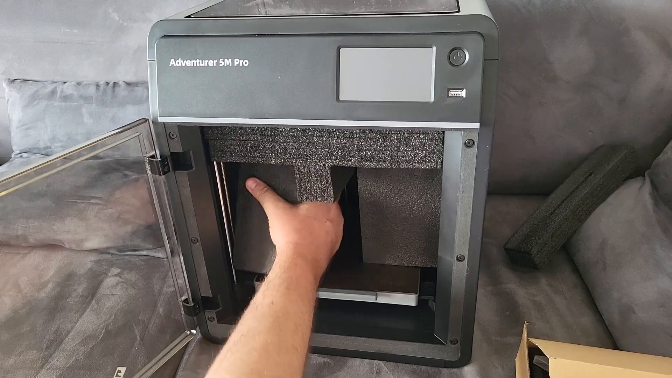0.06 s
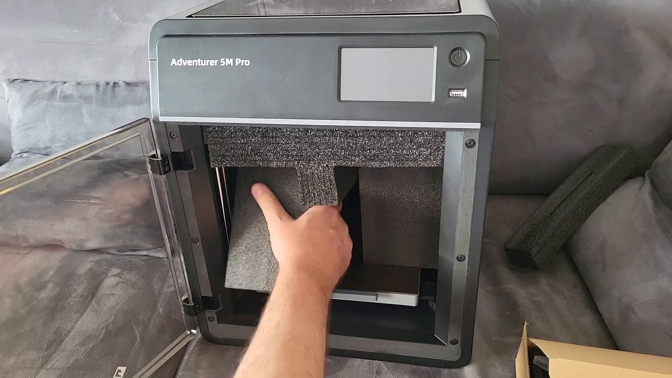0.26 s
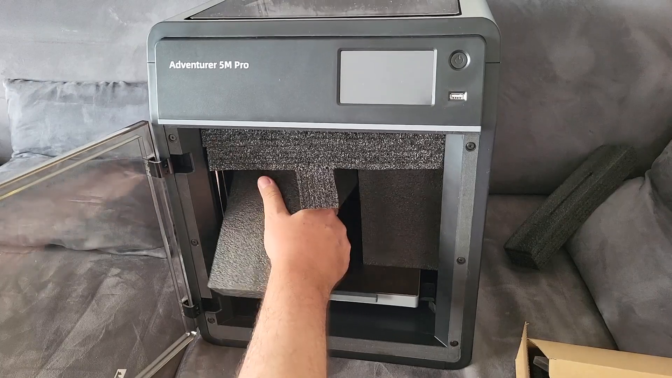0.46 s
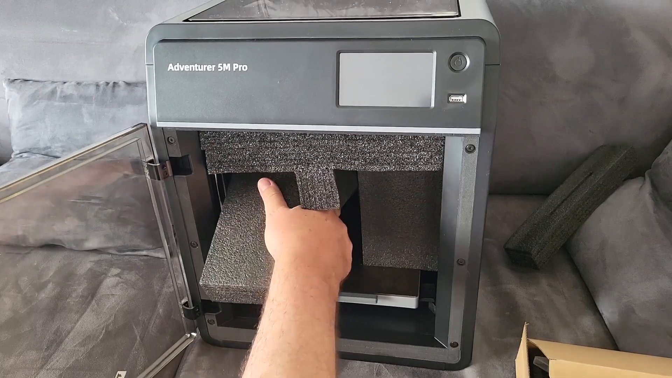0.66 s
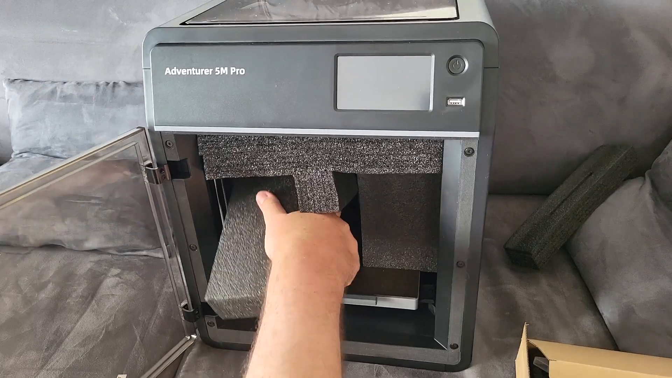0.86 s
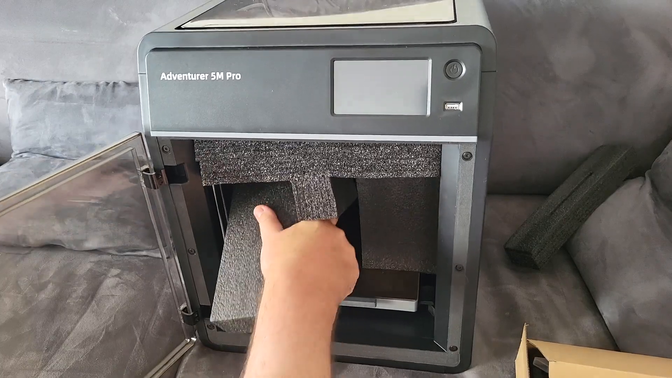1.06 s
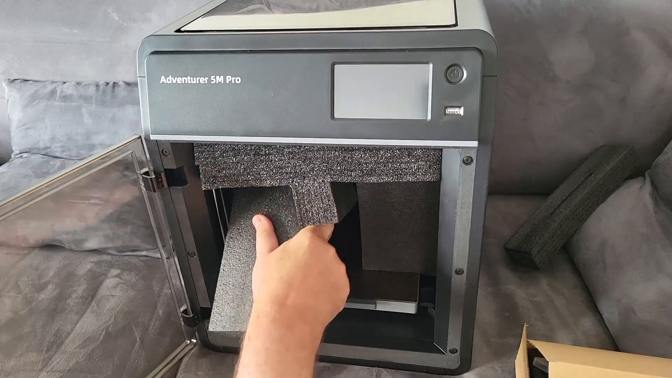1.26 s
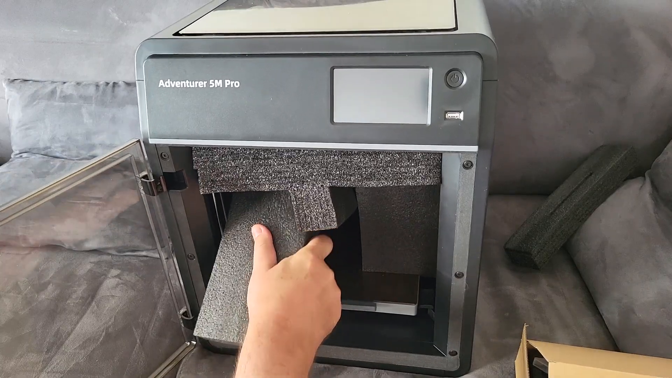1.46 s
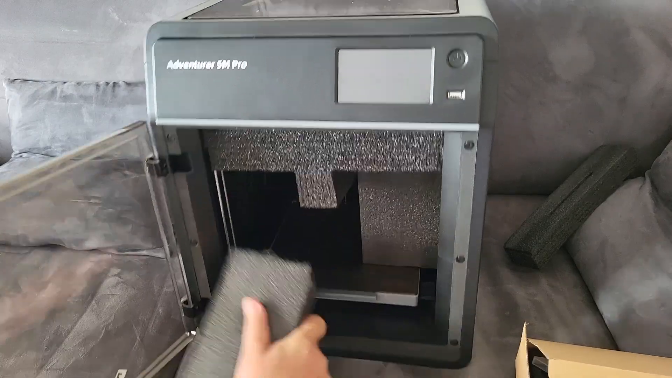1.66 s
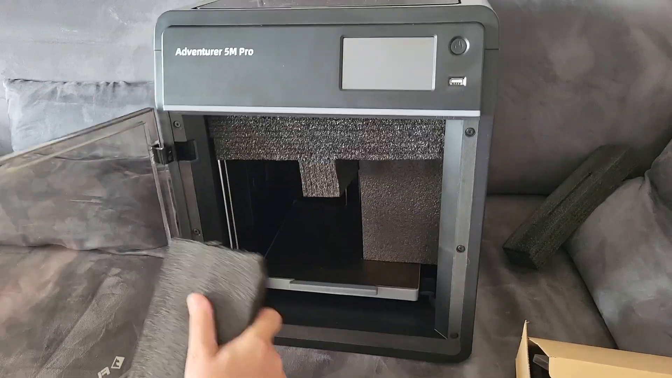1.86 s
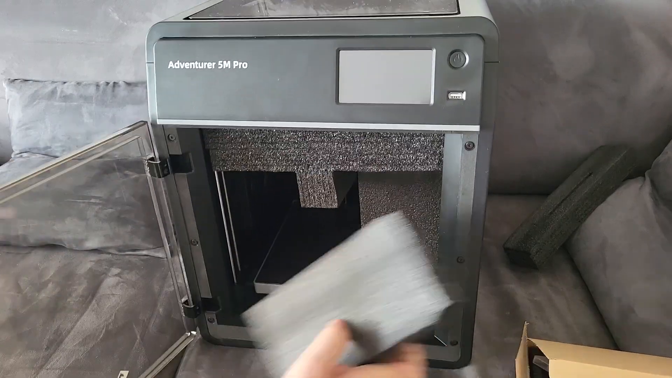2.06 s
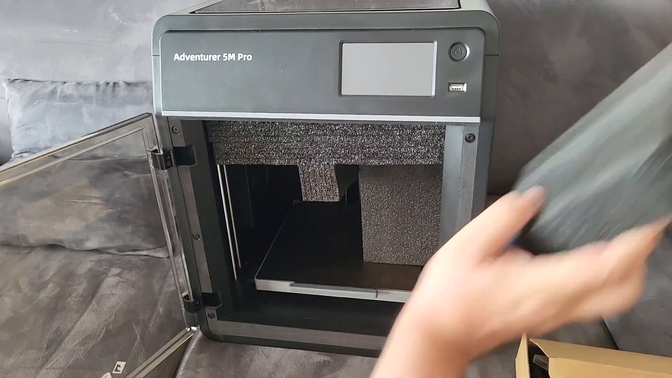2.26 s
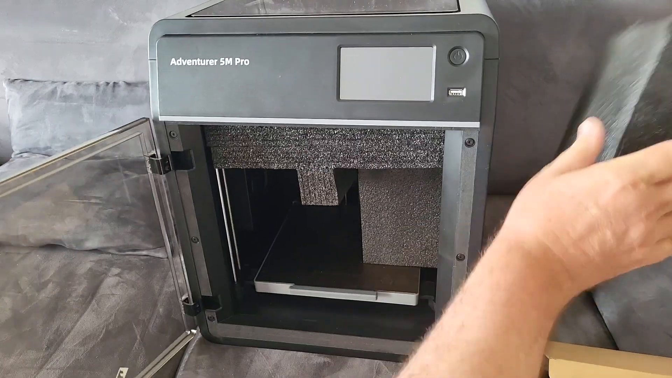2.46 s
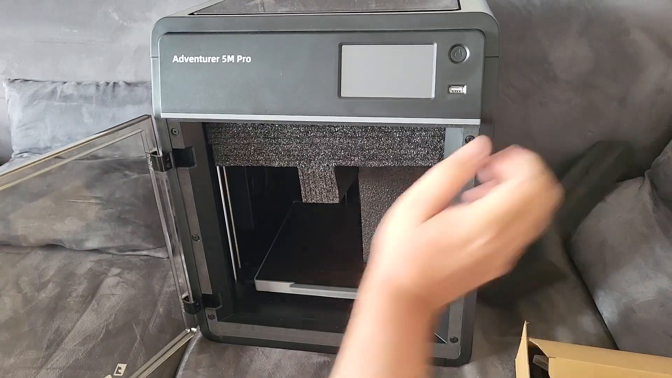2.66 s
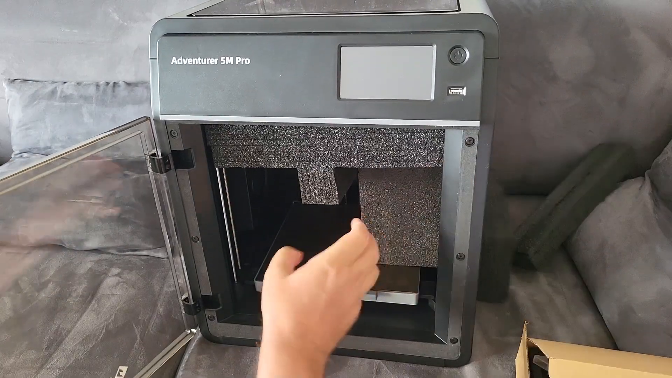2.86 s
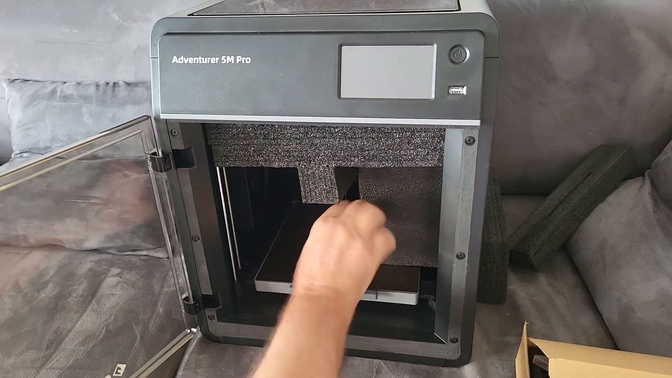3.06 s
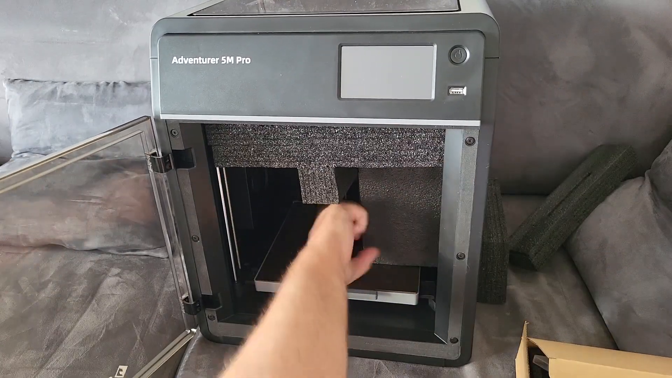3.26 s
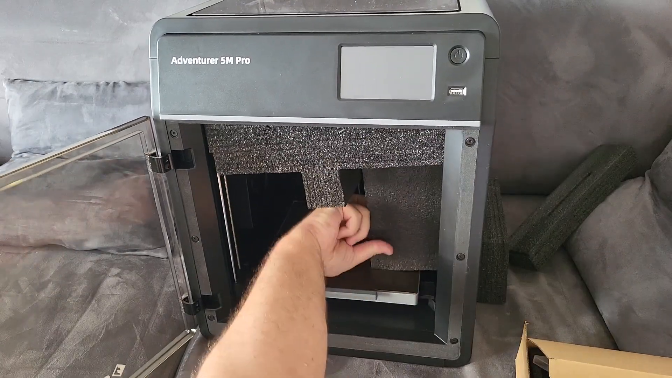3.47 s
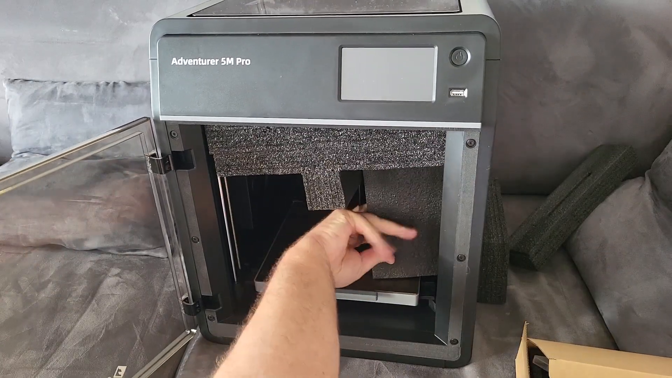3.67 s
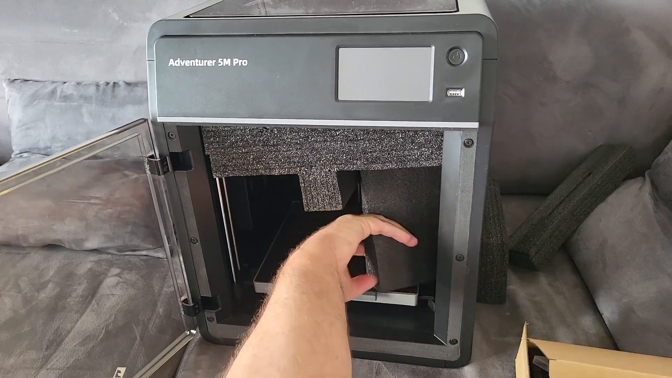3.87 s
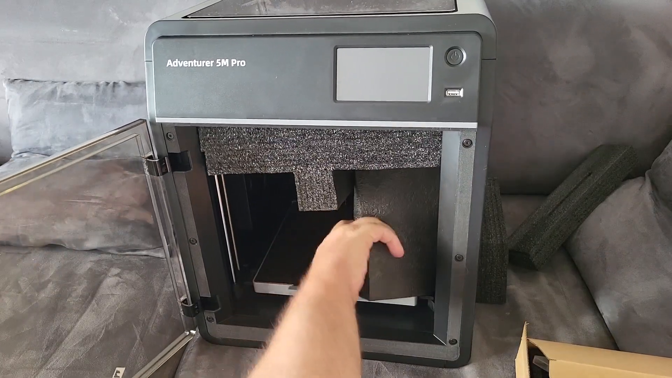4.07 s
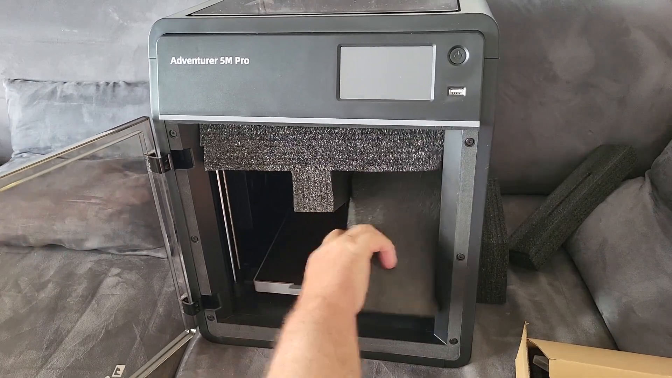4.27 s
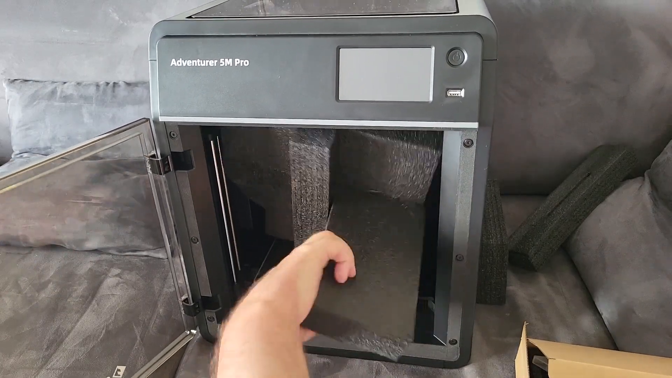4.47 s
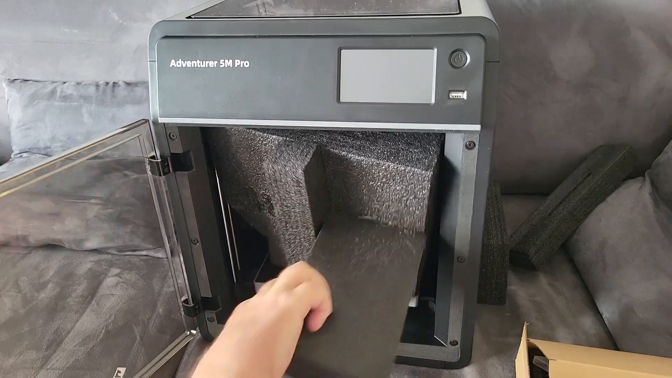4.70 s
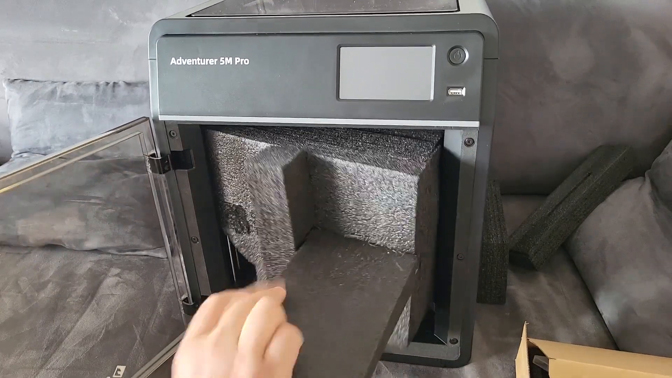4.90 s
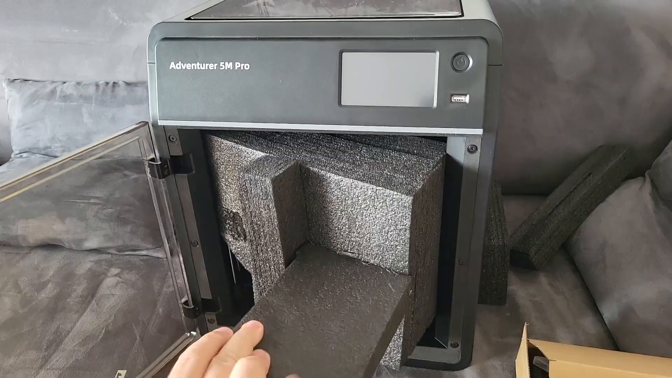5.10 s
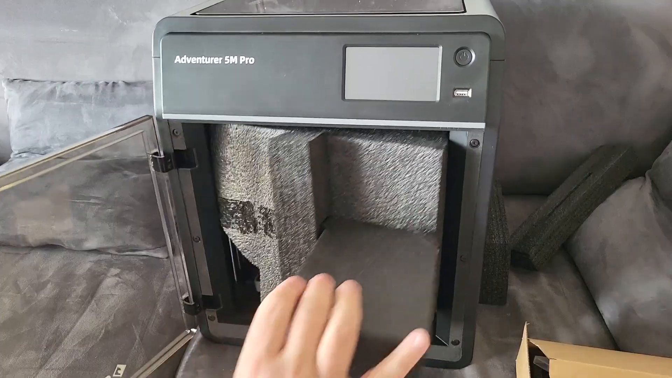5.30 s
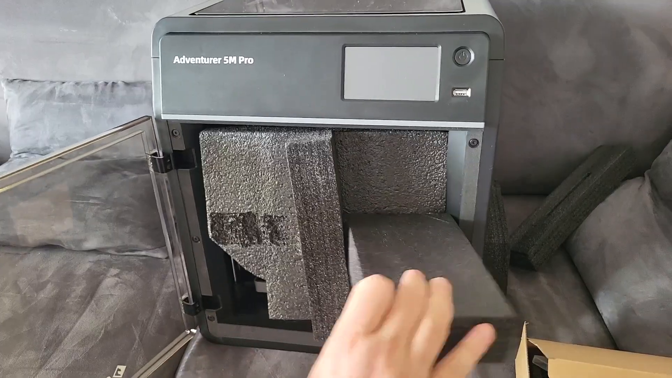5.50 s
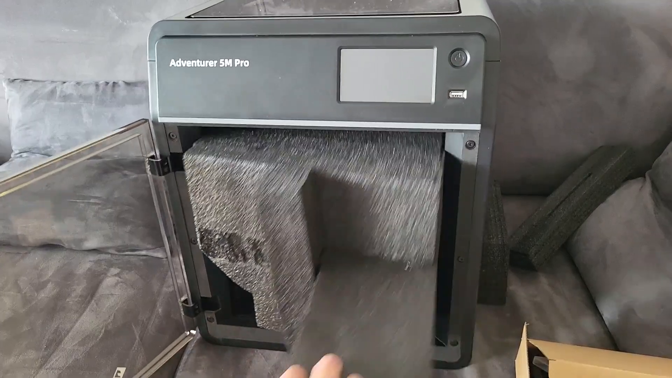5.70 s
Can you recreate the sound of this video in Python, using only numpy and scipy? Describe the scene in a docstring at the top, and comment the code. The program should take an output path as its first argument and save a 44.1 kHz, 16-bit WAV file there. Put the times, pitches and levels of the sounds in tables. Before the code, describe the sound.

Close mono pickup indoors over a quiet low rumble. Foam creaks and ticks under squeezing, snaps loose with a hard pop, then near quiet with faint grazes and dull thuds. Fingers bump while finding a new grip; longer foam scrapes build into a quick bright rasp and a clattering knock against hollow panels, ending with a few more rubs and bumps.

```python
"""Foam packing pulled from a machine

A hand works foam blocks out of a machine's enclosure in a small furnished room.
The foam rubs and creaks as random tiny slips shake it, and larger cells tick or crackle.
Twice a block springs free with a loud knock: ringing tones plus a noisy rattle.
In between, the first block is dropped on a sofa (low tones with a dull puff) and the fingers
bump about for a new grip (short noise bursts). A steady filtered noise is the room's rumble.
"""
import sys
import numpy as np
from scipy import signal
from scipy.fft import rfft, irfft, next_fast_len
from scipy.io import wavfile
from scipy.ndimage import uniform_filter1d, map_coordinates

SR = 44100
rng = np.random.default_rng(int(sys.argv[2]) if len(sys.argv) > 2 else 0)


def put_to_file(sound):
    """Save the sound as 16-bit audio at rate SR, in the file named by the first command-line argument."""
    columns = np.atleast_2d(sound).T  # one column per channel
    safe = np.clip(columns, -1, 1)
    whole_steps = np.round(safe * 32767)
    wavfile.write(sys.argv[1], SR, whole_steps.astype(np.int16))


N = 253171
TIME = np.arange(N) / SR  # seconds from the start of the scene
AGE = np.arange(SR // 2) / SR  # seconds since a contact, for half a second

# Pushes and pulls that slide the foam, with levels before the mix in rubbing():
# (start [s], length [s], level [dB], swell over the stroke [dB], hollow part [dB], fizz part [dB],
#  hollow resonance [Hz], scrape resonance [Hz])
STROKES = [(0.0, .08, -60, -4, 2, -5.5, 570, 1610), (0.132, 0.12, -62, 0.5, -11, -8, 340, 2380),
           (0.33, 0.1, -64, -6, -6.5, -3.5, 350, 2100), (0.463, .11, -56.5, 2, -13.5, -3, 360, 2090),
           (0.612, 0.026, -43, 3.5, -12, -8, 326, 2183), (0.705, .15, -55, -2, -9.5, -5, 354, 1900),
           (0.942, .022, -52, -2, -3, -3, 337, 1600), (0.986, .07, -60, -4, -5, -2.5, 343, 1550),
           (1.352, 0.012, -61, -1, -3.5, -1, 340, 1520), (1.395, .21, -61, 9.5, -4, -0.5, 330, 1620),
           (1.637, 0.013, -36.5, 2.5, 2, -6, 315, 1590), (1.685, .04, -50.5, -1.5, -5.5, -2.5, 312, 1526),
           (1.961, .135, -69.5, 6.5, -3, 4, 350, 1880), (2.128, 0.029, -55.5, 0.5, -22.5, -1.5, 356, 1830),
           (2.244, 0.097, -72.5, -6, 7.5, -16, 345, 1750), (2.742, 0.075, -64.5, -7, 2.5, -11, 325, 1410),
           (3.215, 0.01, -62, 0, 1.5, -1.5, 305, 1780), (3.39, .025, -62, -3.5, 0, -6, 453, 1586),
           (3.622, 0.0076, -59.5, 0, 4, -10.5, 510, 1560), (3.806, 0.088, -62.5, -3.5, 5, -6, 520, 1580),
           (3.922, .17, -74, -10, -0.5, -7, 450, 1430), (4.116, 0.018, -51.5, -7, -2.5, -11.5, 249, 1380),
           (4.235, 0.07, -57, -3, -1.5, -13.5, 277, 1320), (4.352, .11, -54, 0, -1.5, -8, 284, 1420),
           (4.525, 0.055, -53.5, -3, -2.5, -8, 293, 1320), (4.629, 0.051, -53, -0.5, -8.5, -6.5, 415, 1450),
           (4.788, .015, -45, -4.5, -7, -12.5, 340, 1210), (4.835, 0.21, -56, -2, -4.5, -2.5, 265, 1480),
           (5.273, .062, -53, -1, -2.5, -7, 282, 1180), (5.449, 0.078, -51, -2.5, -2, -5, 350, 1450),
           (5.649, 0.13, -49, -2.5, -1.5, -7, 276, 1290)]
# The fast slide along the frame: (time [s], level [dB])
SLIDE_LEVEL = [(4.72, -120), (4.8, -73), (4.84, -60), (4.88, -65), (4.92, -54), (4.98, -61.5), (5.05, -69),
               (5.1, -120)]
# Tone of its bright rasp: (frequency [Hz], relative level [dB per Hz])
RASP_TONE = [(1800, -40), (2600, 0.5), (3050, 0.5), (3900, -3.5), (5100, 1), (6000, -4.5), (7500, -27.5),
             (12000, -30)]
# Tone of the hollow part: (multiple of the resonance [ratio], relative level [dB per Hz])
HOLLOW_TONE = [(.15, -22.5), (.45, -7.5), (.7, -1), (1, -3), (1.3, -4.5), (1.7, -8.5), (2.6, -22.5),
               (8, -68.5)]
# Tone of the scraping part: (multiple of the resonance [ratio], relative level [dB per Hz])
SCRAPE_TONE = [(.2, -39.5), (.45, -11), (.62, -3), (.8, -2.5), (1, -2), (1.35, -8), (2, -17), (2.8, -20),
               (4.5, -44), (9, -76.5)]
# Tone of the fizzing foam cells: (frequency [Hz], relative level [dB per Hz])
FIZZ_TONE = [(1200, -37.5), (2300, 2.5), (3000, 1), (3900, 2.5), (5000, -2.5), (6500, -5.5), (8000, -9),
             (9800, -8), (11300, -12.5), (12700, -18.5), (15800, -22.5)]
ATTACK_T60_S = 0.11  # the foam gathers speed before a stroke: time to rise by 60 dB


def rubbing():
    """The same slips shake the whole block, scrape at its face and, with finer slips, fizz in its cells."""
    out = np.zeros(N)
    judder = unit(amp(2 * wobble(rate=80)))  # the block moves in small jerks
    for start, length, db, swell_db, hollow_db, fizz_db, hollow_hz, scrape_hz in STROKES:
        t = max(start - ATTACK_T60_S, 0) + np.arange(SR) / SR
        gain = stroke_gain(t - start, length, db, swell_db) * np.interp(t, TIME, judder)
        coarse = slips(t, rate=2600) * gain
        extra = slips(t, rate=8200) * gain
        fine = (coarse + extra) / np.sqrt(2)
        hollow = amp(hollow_db - 2.0) * colour(coarse, around(HOLLOW_TONE, hollow_hz))
        scrape = amp(-3.5) * colour(coarse, around(SCRAPE_TONE, scrape_hz))
        fizz = amp(fizz_db) * colour(fine, FIZZ_TONE)
        add(out, t[0], hollow + scrape + fizz)
    slide_db, = curves(SLIDE_LEVEL)
    rasp = colour(slips(TIME, rate=20000) * amp(slide_db), RASP_TONE)
    return in_room(out + rasp, wet_db=-9.5)


RELEASE_T60_S = 0.21  # coming to rest after a stroke: time to fall by 60 dB
CREEP_DB, CREEP_T60_S = -75, 1.1  # the foam creeps on faintly, however hard the stroke was


def stroke_gain(age, length, db, swell_db):
    """A stroke gathers speed, swells or eases while it lasts, then stops and creeps on a little."""
    before = np.maximum(-age, 0)
    after = np.maximum(age - length, 0)
    level_db = db + swell_db * (np.clip(age / length, 0, 1) - 0.5)
    slide = amp(level_db - 60 * after / RELEASE_T60_S)
    creep = amp(CREEP_DB - 60 * after / CREEP_T60_S)
    return amp(-60 * before / ATTACK_T60_S) * np.maximum(slide, creep)


# How unequal the slips are, more crackly when larger: (time [s], spread of slip size [dB])
GRIT = [(0, 0), (0.6, 4.5), (1.0, 2.5), (1.5, 7.5), (2.2, 3.5), (3.5, 3), (4.4, 1.5), (4.9, -2), (5.5, 3.5)]


def slips(t, rate):
    """Foam cells stick and slip: random clicks of unequal size, evened out to a steady mean power."""
    spread_db = np.interp(t, *np.transpose(GRIT))
    sizes = amp(spread_db * np.minimum(rng.exponential(size=len(t)), 4.5))
    happens = rng.random(len(t)) < rate / SR
    train = happens * sizes * rng.choice([-1, 1], len(t))
    power = np.abs(uniform_filter1d(train ** 2, size=1400))
    return train / np.sqrt(power + 1e-6)


# Foam cells snapping past an edge, with levels before the mix in crackles():
# (time [s], level [dB], resonance [Hz])
CRACKLES = [(0.135, -61, 2600), (0.179, -54, 2360), (0.317, -49, 2600), (0.366, -45, 2480),
            (0.456, -42, 1980), (0.556, -37, 2360), (0.627, -27.5, 1800), (0.649, -54, 2400),
            (0.667, -39.5, 2480), (0.803, -37, 1600), (0.922, -43.5, 1900), (0.958, -34, 1560),
            (1.05, -44.5, 1550), (1.317, -53.5, 2360), (1.349, -43.5, 1270), (1.362, -43.5, 1470),
            (1.484, -41, 1470), (1.524, -41, 1410), (1.542, -35, 1340), (2.05, -46, 2240),
            (4.254, -43, 1400), (5.563, -37.5, 2750)]
TICK_FIZZ_DB = -33.5  # fizz of a tick listed at 0 dB
TICK_FIZZ_GROWTH = 0.55  # dB of fizz per dB of tick: bigger cells snap duller


def crackles():
    """Single larger cells let go with a dry tick."""
    out = np.zeros(N)
    for s, db, hz in CRACKLES:
        grip = press(0.0014)
        fizz_db = TICK_FIZZ_DB + TICK_FIZZ_GROWTH * db
        tick = amp(db - 6.0) * burst(grip, around(SCRAPE_TONE, hz))
        add(out, s, tick + amp(fizz_db) * burst(grip, FIZZ_TONE))
    return in_room(out, wet_db=-9.5)


# Tone of the small ticks: (frequency [Hz], relative level [dB per Hz])
STRAY_TONE = [(600, -25), (1500, 0), (3000, -2), (4500, 0.5), (7000, -1.5), (10000, -1.5), (13000, -10.5),
              (15800, -13.5)]
SQUEEZE_START_S, SQUEEZE_END_S = 0.3, 1.62  # while the first block is squeezed
STRAY_PER_S, STRAY_DB, STRAY_SPREAD_DB = 45, -55.5, 5  # rate, middle level and spread


def stray_ticks():
    """Small cells give way one by one under the grip: faint, bright ticks at random times."""
    squeezed = (TIME > SQUEEZE_START_S) & (TIME < SQUEEZE_END_S)
    sizes = amp(STRAY_DB + STRAY_SPREAD_DB * np.clip(rng.standard_normal(N), -2, 2))
    ticks = (rng.random(N) < STRAY_PER_S / SR) * squeezed * sizes
    return in_room(colour(ticks, STRAY_TONE), wet_db=-5.5)


# Fingers and blocks bumping the panels:
# (time [s], scrape level [dB], hollow relative to scrape [dB], fizz relative to scrape [dB],
#  hollow resonance [Hz], rise [s])
BUMPS = [(1.636, -31, -0.5, -13, 235, 0.0033), (2.752, -53, -7, -9, 443, 0.0018),
         (3.462, -60.5, 6.5, -4.5, 394, 0.0092), (3.658, -41.5, -6, -22, 540, .0046),
         (4.105, -44, -2.5, -3.5, 232, 0.0046), (4.278, -39.5, 1, -25, 326, 0.0027),
         (4.364, -46, -1, -11, 284, 0.0062), (4.508, -56.5, 11.5, -11, 231, 0.0039),
         (4.550, -43.5, -7, -16, 295, 0.0041), (5.031, -55, 13, -22, 258, 0.0089),
         (5.304, -46.5, -2.5, -12.5, 260, 0.0023), (5.381, -47.5, 2, -6, 256, 0.0036),
         (5.440, -39.5, -7.5, -21, 333, 0.0033)]
BUMP_SCRAPE_HZ = 1380  # every bump scrapes at the same panel resonance


def bumps():
    """Fingers and foam give way on contact, so each bump is a short, rounded burst."""
    out = np.zeros(N)
    for s, db, hollow_db, fizz_db, hollow_hz, rise in BUMPS:
        force = press(rise)
        hollow = amp(hollow_db) * burst(force, around(HOLLOW_TONE, hollow_hz))
        scrape = burst(force, around(SCRAPE_TONE, BUMP_SCRAPE_HZ))
        fizz = amp(fizz_db) * burst(force, FIZZ_TONE)
        add(out, s, amp(db) * in_room(hollow + scrape + fizz, wet_db=-6.0))
    return out


# A block springs free: (time [s], snap level [dB], enclosure knock level [dB], rattle level [dB])
RELEASES = [(1.651, -13, -50.5, -35), (5.0599, -22.5, -35.5, -23.5)]
# Ringing tones of the released block: (frequency [Hz], level [dB], time to fall by 60 dB [s])
BLOCK_MODES = [(160, -18, 0.019), (293, -2, 0.029), (492, -2, 0.038), (1330, -4.5, 0.022),
               (2030, -4.5, 0.0067), (3140, -4, 0.0036), (4400, -9.5, 0.013), (6760, -7.5, 0.0015)]
# Ringing tones of the enclosure's panels: (frequency [Hz], level [dB], time to fall by 60 dB [s])
PANEL_MODES = [(126.3, -9, 0.37), (221.4, -4.5, 0.35), (255, -3, 0.23), (322, -5.5, 0.14), (398, 7.5, 0.23),
               (492, -6.5, 0.57), (879, -4.5, 0.22), (1142, -6, 0.2), (1325, -8, 0.1), (1440, -10.5, 0.16),
               (1507, -3.5, 0.11)]
# Tone of the rattling enclosure: (frequency [Hz], relative level [dB per Hz])
RATTLE_TONE = [(40, -35), (130, -4), (300, -0.5), (500, -3), (700, -7.5), (900, -1.5), (1500, -7.5),
               (2000, -10), (3200, -15.5), (5000, -23), (7500, -30.5), (10500, -29), (13000, -42.5),
               (15800, -56.5)]
CHATTER_DB = 2.6  # how unequal the contacts of the rattle are


def releases():
    """The bent block snaps straight, knocks the panels and sets the enclosure rattling."""
    out = np.zeros(N)
    for s, snap_db, knock_db, rattle_db in RELEASES:
        snap = amp(snap_db) * (ring(BLOCK_MODES) + 0.096 * burst(fade(0.016), FIZZ_TONE))
        knock = amp(knock_db) * ring(PANEL_MODES)
        chatter = unit(amp(CHATTER_DB * wobble(rate=900)))[:len(AGE)]  # quick repeated contacts
        rattle = amp(rattle_db) * burst(fade(0.21) * chatter, RATTLE_TONE)
        add(out, s, in_room(snap, wet_db=-11.5) + knock + in_room(rattle, wet_db=-11))
    return out


# Soft thuds of foam against the machine and the sofa:
# (time [s], level [dB], pitch [Hz], time to fall by 60 dB [s])
THUDS = [(1.654, -34, 124.5, 0.11), (1.701, -50, 66, 0.46), (1.874, -47.5, 49.8, 0.25),
         (2.793, -44.5, 192, 0.26), (2.974, -46, 161.5, 0.12), (2.982, -52.5, 198.4, 0.45),
         (3.225, -52.5, 232, 0.23), (3.661, -43, 547, 0.1), (4.109, -52.5, 126, 0.34),
         (5.44, -46, 128, 0.14)]


def thuds():
    """A soft, heavy contact gives one low tone and a dull puff."""
    out = np.zeros(N)
    for s, db, hz, t60 in THUDS:
        soft_start = 1 - np.exp(-AGE / 0.0013)
        tone = np.sin(2 * np.pi * hz * AGE) * fade(t60) * soft_start
        puff = 0.51 * burst(fade(0.17), around(HOLLOW_TONE, hz))
        add(out, s, amp(db) * (tone + puff))
    return out


# Tone of the thin hiss: (frequency [Hz], relative level [dB per Hz])
WISP_TONE = [(4000, -23), (7500, -17), (9500, -13), (10300, -2.5), (11100, -13), (12000, -17), (15800, -32)]
WISP_S, WISP_RISE_S, WISP_DB = 1.825, 0.024, -65.5  # as the first block comes clear


def wisp():
    """A light graze of the foam gives only a thin, high hiss."""
    out = np.zeros(N)
    add(out, WISP_S, amp(WISP_DB) * burst(press(WISP_RISE_S), WISP_TONE))
    return out


# Tone of the quiet room: (frequency [Hz], relative level [dB per Hz])
QUIET_TONE = [(20, -10), (55, 2.5), (90, -4), (150, -15.5), (300, -21), (700, -22.5), (1250, -25.5),
              (1900, -31), (4600, -34), (7500, -40.5), (15000, -47)]


def room_tone():
    """A low, steady indoor rumble with a trace of hiss, made from filtered noise."""
    return amp(-66) * unit(colour(rng.standard_normal(N), QUIET_TONE))


# How long the room's tail lasts: (frequency [Hz], time to fall by 60 dB [s])
ROOM_DECAY = [(100, .4), (400, 0.28), (2000, 0.32), (6000, 0.44), (14000, 0.16)]


def in_room(x, wet_db):
    """The direct sound, distinct echoes from near surfaces and a diffuse tail."""
    hz, t, z = signal.stft(rng.standard_normal(len(AGE)), SR, nperseg=256)
    decay = amp(-60 * t / along(ROOM_DECAY, hz)[:, None])
    tail = signal.istft(z * decay, SR)[1][:len(AGE)]
    hits = rng.random(len(AGE)) < 900 / SR  # about 900 echoes a second
    walls = hits * rng.standard_normal(len(AGE)) * fade(0.054)
    echo = (unit(tail) + 0.88 * unit(walls)) * (1 - np.exp(-AGE / 0.0031))
    wet = signal.fftconvolve(x, echo / np.linalg.norm(echo))[:len(x)]
    return x + amp(wet_db) * wet


def press(rise):
    """A soft contact: the force swells for rise seconds and lets go."""
    return (AGE / rise) ** 2 * np.exp(2 - 2 * AGE / rise)


def fade(t60):
    """An exponential decay that falls by 60 dB in t60 seconds."""
    return np.exp(-np.log(1000) * AGE / t60)


def ring(modes):
    """A struck body rings as fading sine tones, here of alternating sign."""
    out = np.zeros(len(AGE))
    for k, (hz, db, t60) in enumerate(modes):
        out += (-1) ** (k + 1) * amp(db) * fade(t60) * np.sin(2 * np.pi * hz * AGE)
    return out


def burst(envelope, spectrum):
    """A cluster of tiny slips: coloured noise under an envelope, with that envelope's energy."""
    noise = envelope * rng.standard_normal(len(envelope))
    return unit(colour(noise, spectrum)) * np.sqrt(np.mean(envelope ** 2))


def colour(x, spectrum, size=8192):
    """Filter of energy 1 with the given spectrum, responding only after its input."""
    hz = np.fft.rfftfreq(size, 1 / SR)
    cepstrum = irfft(np.log(amp(along(spectrum, hz))))
    cepstrum[1:size // 2] *= 2  # fold onto positive times: a minimum-phase filter
    cepstrum[size // 2 + 1:] = 0
    response = irfft(np.exp(rfft(cepstrum)))
    return signal.fftconvolve(x, response / np.linalg.norm(response))[:len(x)]


def around(shape, hz):
    """Place a relative spectrum at a resonance."""
    return np.array(shape) * [hz, 1]


def wobble(rate):
    """A smooth random curve, rate knots a second."""
    knots = rng.standard_normal(int(N * rate / SR) + 4)
    return map_coordinates(knots, [TIME * rate])


def along(points, hz):
    """Read (frequency [Hz], value) points on a log axis."""
    f, v = np.transpose(points)
    return np.interp(np.log(hz + 1), np.log(f + 1), v)


def curves(rows):
    """One value per sample for each column after the time."""
    s, *cols = np.transpose(rows)
    return [np.interp(TIME, s, c) for c in cols]


def amp(db):
    """Decibels to gain."""
    return 10 ** (np.asarray(db) / 20)


def unit(x):
    """Scale to an rms (average strength) of 1."""
    return x / np.sqrt(np.mean(x ** 2) + 1e-20)


def add(track, s, sound):
    """Mix a sound into the track at time s in seconds."""
    start = max(round(s * SR), 0)
    track[start:start + len(sound)] += sound[:N - start]


# Tone of the open enclosure: (frequency [Hz], relative level [dB per Hz])
CAVITY_TONE = [(300, 0), (600, 1), (840, -8), (1020, -4), (1220, 2), (1380, -1), (1510, 2), (1800, -2),
               (2300, 1), (2650, -1), (3150, 3.5), (3750, -3), (4600, 1), (5500, 0)]


def scene():
    """The handling is coloured by the open enclosure; all reaches one microphone."""
    handling = colour(rubbing() + crackles() + stray_ticks() + bumps(), CAVITY_TONE)
    return (handling + releases() + thuds() + wisp() + room_tone())[None]


TOP_HZ = 15750  # the recorder's band limit


def record(dry):
    """The recorder keeps nothing above its band limit."""
    size = next_fast_len(N + SR // 2)
    keep = np.fft.rfftfreq(size, 1 / SR) < TOP_HZ
    return irfft(rfft(dry, size) * keep, size)[:, :N]


dry = scene()
out = record(dry)
put_to_file(out)
```